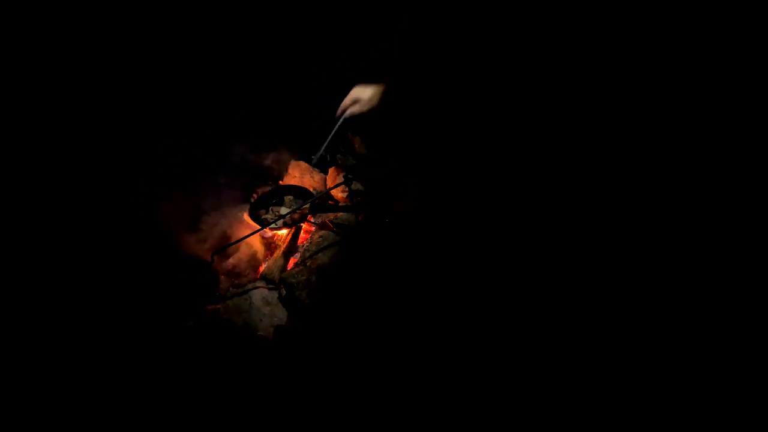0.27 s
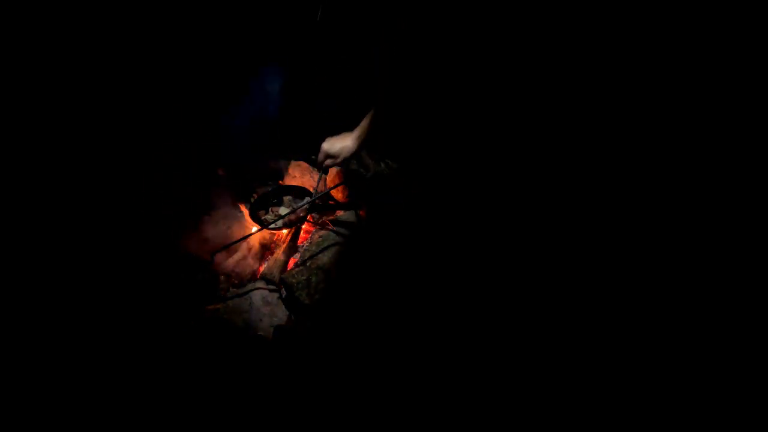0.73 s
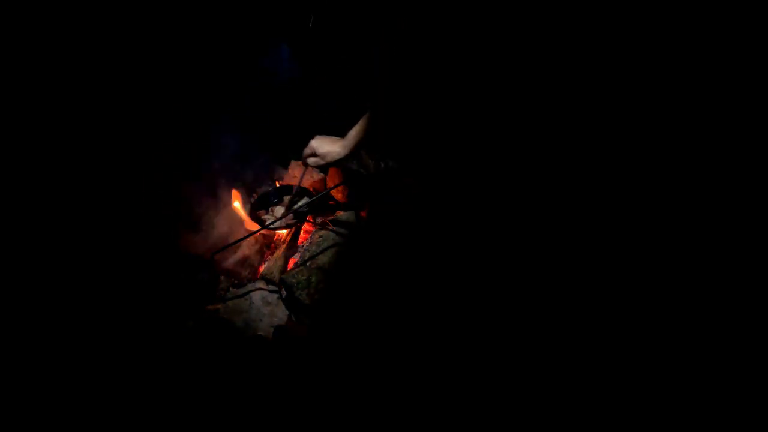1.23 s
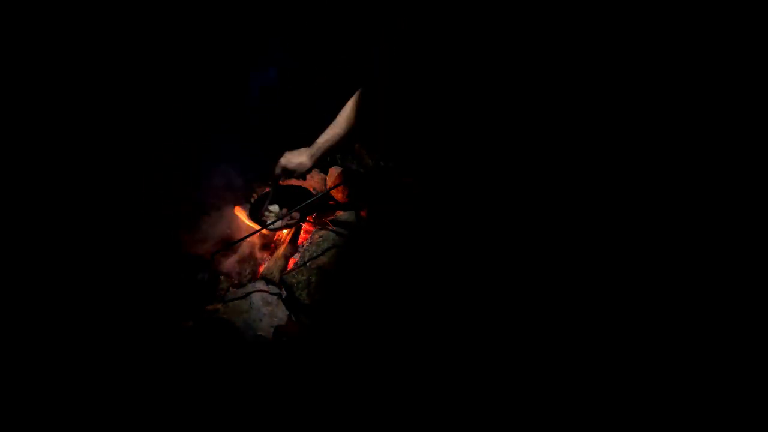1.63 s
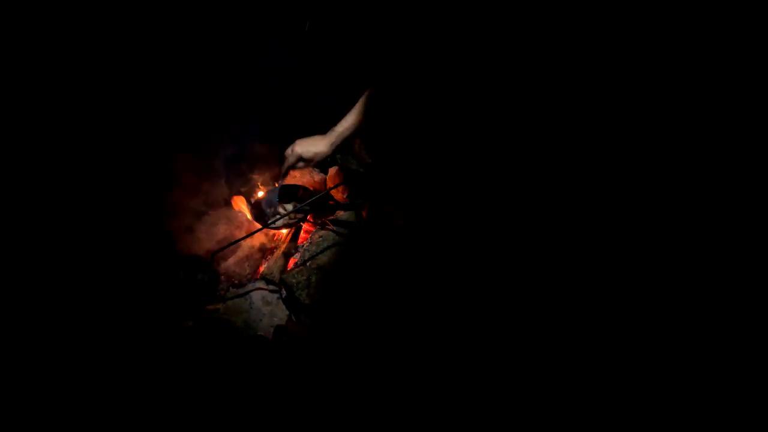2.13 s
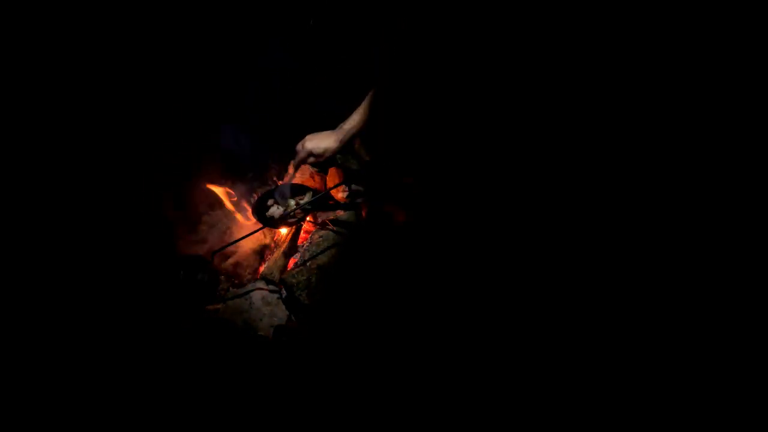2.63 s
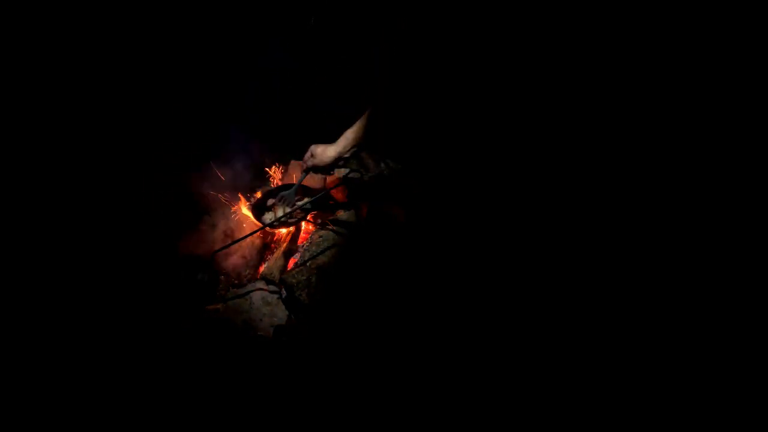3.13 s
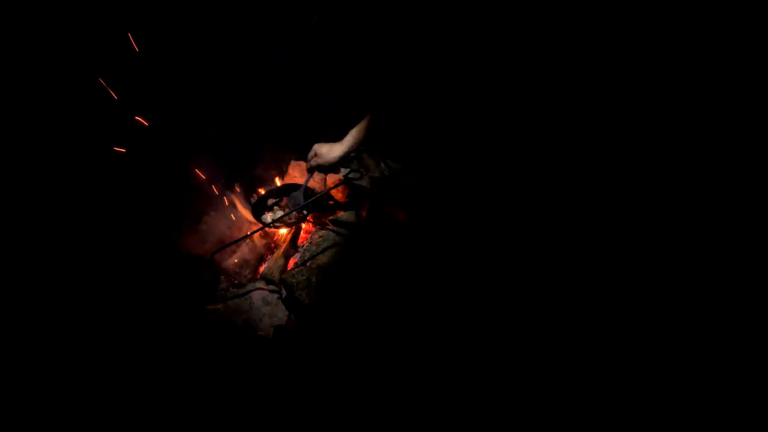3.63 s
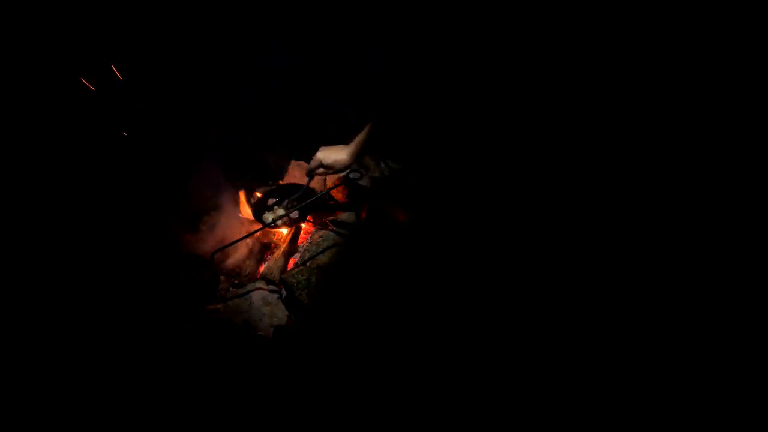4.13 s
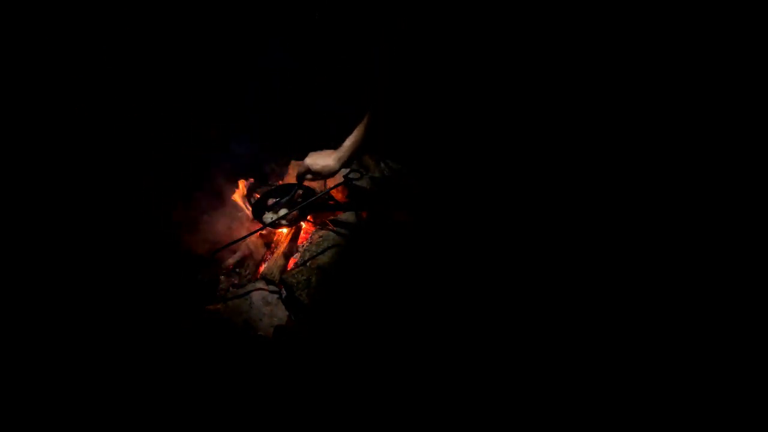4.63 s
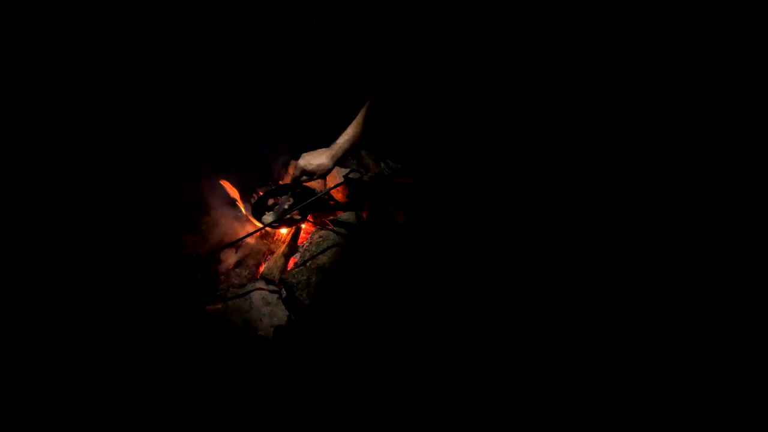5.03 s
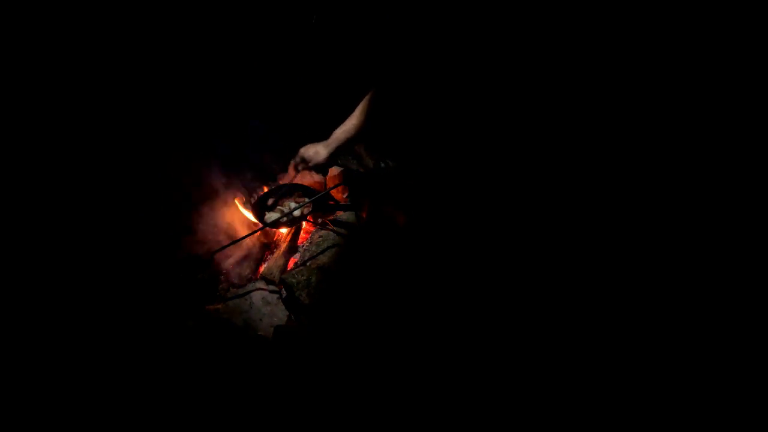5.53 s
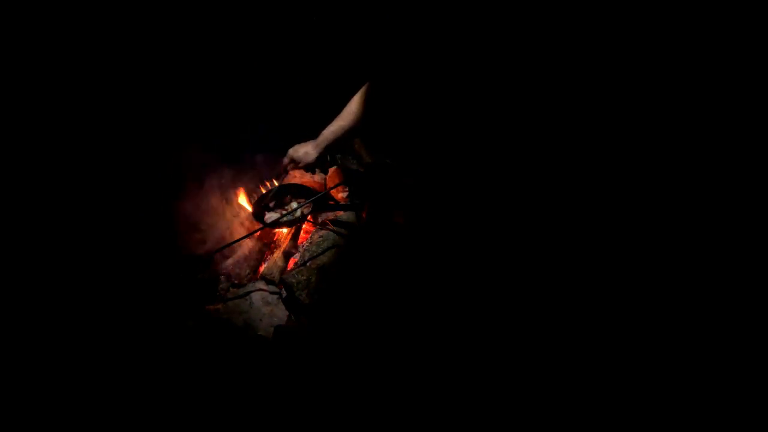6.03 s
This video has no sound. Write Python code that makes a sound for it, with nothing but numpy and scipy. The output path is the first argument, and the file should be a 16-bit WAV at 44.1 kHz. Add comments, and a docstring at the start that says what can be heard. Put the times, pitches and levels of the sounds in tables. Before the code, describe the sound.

Bacon fries in a skillet over a campfire at night. A soft bubbling hiss thickens with bright spits while a metal spatula knocks and scrapes the pan. Around three seconds a log pops violently with a short thump and ember crackle; the sizzle dips briefly, then returns strong. Close, dry, nearly mono outdoor pickup with no echo.

```python
"""At a campfire at night, bacon fries in an iron skillet over rumbling flames; a spatula knocks the pan.
Fat hisses as patchy filtered noise with tiny noise bursts; bubbles are short sines, and spits add a splash.
The spatula drives the damped modes of the pan. A log pops hard with a bang, a thump and a spray of embers.
Gain control ducks under loud peaks and slowly recovers; the stereo image is almost mono."""
import sys
import numpy as np
from scipy import signal
from scipy.fft import rfft, irfft, next_fast_len
from scipy.io import wavfile
from scipy.ndimage import uniform_filter1d, map_coordinates

SR = 44100
rng = np.random.default_rng(int(sys.argv[2]) if len(sys.argv) > 2 else 0)


def transcribe(signal):
    """Save signal, clipped to [-1, 1], as a 16-bit WAV file at the path in sys.argv[1]."""
    frames = np.atleast_2d(signal).T
    limited = np.clip(frames, -1, 1)
    pcm = np.round(limited * 32767).astype(np.int16)
    wavfile.write(sys.argv[1], SR, pcm)


N = 277389


def amp(db):
    """Decibel law: a level in dB as an amplitude factor."""
    return 10 ** (np.asarray(db) / 20)


def unit(x):
    """Power normalisation: x scaled to an RMS of one."""
    return x / np.sqrt(np.mean(x ** 2) + 1e-20)


def curves(rows):
    """Linear interpolation: one value per sample for each column after the time."""
    s, *columns = np.transpose(rows)
    return [np.interp(np.arange(N) / SR, s, column) for column in columns]


def wobble(rate):
    """Spline interpolation: a smooth random curve with rate knots a second."""
    knots = rng.standard_normal(int(N * rate / SR) + 4)
    return map_coordinates(knots, [np.arange(N) * rate / SR])


def coloured(x, points, tilt_db=0):
    """Minimum-phase filtering: (Hz, dB) gain points, tilted in dB per octave about 3500 Hz, made causal."""
    m = next_fast_len(N + SR // 4)
    hz = np.fft.rfftfreq(m, 1 / SR) + 1  # the offset avoids log 0
    f, db = np.transpose(points)
    gain_db = np.interp(np.log(hz), np.log(f), db) + tilt_db * np.log2(hz / 3500)
    cepstrum = irfft(np.log(amp(gain_db) + 1e-6), m)
    # folding the cepstrum onto positive time gives the minimum phase
    cepstrum[1:m // 2] *= 2
    cepstrum[m // 2 + 1:] = 0
    return irfft(rfft(x, m) * np.exp(rfft(cepstrum)), m)[:N]


def patchy(depth_db):
    """Time-frequency modulation: white noise with patches of random gain."""
    spectrogram = signal.stft(rng.standard_normal(N), nperseg=256)[2]
    field = uniform_filter1d(rng.standard_normal(spectrogram.shape), 8, 0)
    field = uniform_filter1d(field, 6, 1)
    return signal.istft(spectrogram * amp(depth_db * unit(field)), nperseg=256)[1][:N]


def scatter(s, shapes):
    """Superposition: each row of shapes added at its time in s."""
    at = np.round(s * SR).astype(int)[:, None] + np.arange(shapes.shape[1])
    return np.bincount(at.ravel(), shapes.ravel(), N + shapes.shape[1])[:N]


def bubbles(s, db, hz, cycles, size):
    """Bubble resonance: bursts as sines that swell, die away and rise slightly in pitch."""
    turns = np.outer(hz, np.arange(size) / SR)
    life = turns / np.reshape(cycles, (-1, 1))
    swell = np.e * 4 * life * np.exp(-4 * life)  # peaks at one, a quarter of the way through life
    return scatter(s, amp(db)[:, None] * swell * np.sin(2 * np.pi * turns * (1 + 0.065 * life)))


# Course of the frying: t/s, hiss level/dB, brightness/(dB/octave), bubbling level/dB re the hiss
FRYING_COURSE = [(0.0, -40, -.8, -7), (0.72, -40, -2, -7), (0.92, -35, 0, -1), (1.17, -36, -.8, 0),
                 (1.33, -33, -.2, 0), (1.58, -35.5, .6, -2), (1.85, -33, -.6, -3), (2.15, -36.5, 1, -4),
                 (2.4, -37, -.2, -3), (2.6, -35, -.5, -4), (2.8, -36.5, .1, -4.5), (3.0, -32.5, 1, -5),
                 (3.4, -30.5, .9, -6), (3.9, -33.5, .3, -6), (4.65, -30.5, .4, -4.5),
                 (5.05, -31.5, .5, -3.5), (5.4, -31.5, .3, -8), (5.75, -32.5, .2, -5), (6.29, -31, .8, -6)]
# Spectrum of spattering fat: f/Hz, spectral density level/dB per Hz
FAT_SPECTRUM = [(410, -44), (700, -22), (910, -17), (1110, -12.5), (1360, -13), (2430, -3.5), (3690, -2),
                (6480, -8.5), (7390, -13), (8880, -29), (10800, -16), (12000, -32), (13100, -34),
                (16000, -48)]


def sizzle():
    """Random superposition: steam hiss, a crackle of tiny bursts and ringing bubbles, all in flurries."""
    level_db, bright_db, bubbling_db = curves(FRYING_COURSE)
    flurry_db = 0.68 * wobble(12) + 0.83 * wobble(35) + 0.75 * wobble(110) + 0.65 * wobble(300)

    s, big, life = rng.random((3, 4000))
    t = np.arange(130) / SR
    size_db = -4.5 * np.log(big + 0.01)  # many small, few large
    t60 = 0.0018 + 0.007 * life[:, None] ** 2
    puffs = amp(size_db[:, None] - 60 * t / t60) * rng.standard_normal((len(s), len(t)))
    crackle = unit(scatter(s * (N - 1) / SR, puffs))
    burst = patchy(1.7) + amp(-4.0) * crackle

    # brightness moves by crossfading a dull and a bright version
    share = np.clip(.5 + bright_db / 5, 0, 1)
    dull = unit(coloured(burst, FAT_SPECTRUM, -2.5))
    bright = unit(coloured(burst, FAT_SPECTRUM, 2.5))
    hiss = (1 - share) * dull + share * bright

    s, big, pitch, shape, life = rng.random((5, 8000))
    hz = 3500 * np.exp(.3 * (pitch + shape - 1))
    size_db = -4.5 * np.log(big + 0.034)
    boiling = amp(1.5 * wobble(45))  # bubbles come in clusters of a few hundredths of a second
    ring = unit(boiling * bubbles(s * (N - 1) / SR, size_db, hz, 2.5 + 5.5 * life, size=200))
    return amp(level_db + flurry_db) * (hiss + amp(bubbling_db) * ring)


# Course of the fire's rumble: t/s, level/dB
FLAME_COURSE = [(0.0, -60), (.6, -57.5), (1.0, -60), (2.5, -56.5), (3.3, -54), (3.7, -59), (4.8, -59),
                (5.2, -56), (6.29, -55.5)]
# Spectrum of the fire's roar: f/Hz, spectral density level/dB per Hz
ROAR_SPECTRUM = [(18, -57), (40, -11), (70, -5.5), (120, -6), (170, -2.5), (257, -10), (453, -12),
                 (700, -11), (910, -33), (1540, -120)]


def flames():
    """Broadband low-frequency noise: the lumpy roar of the fire, filtered and slowly modulated."""
    level_db = curves(FLAME_COURSE)[0] + 0.56 * wobble(5.9)
    return amp(level_db) * unit(coloured(patchy(2.0), ROAR_SPECTRUM))


# Lesser spits: mean peak over the hiss and its spread, centre frequency, mean splash over the ring
SMALL_DB, SMALL_SPREAD_DB, SMALL_HZ, SMALL_SPLASH_DB = 11.5, 2, 3800, -12


def small_spits(count, start, stop):
    """Random arrivals: rows like those of the loud spits, with levels that follow the frying."""
    s = rng.uniform(start, stop, count)
    size, pitch, wet = rng.standard_normal((count, 3)).T
    hiss_db = np.interp(s, *np.transpose(FRYING_COURSE)[:2])
    peak_db = hiss_db + SMALL_DB + SMALL_SPREAD_DB * size
    return np.c_[s, peak_db, SMALL_HZ * np.exp(.14 * pitch), SMALL_SPLASH_DB + 4 * wet]


RING_CYCLES, DRIER_PER_DB = 3.1, .03  # a spit with less splash rings longer
STIRRED = (1.5, 3.05)  # (from s, to s): the spatula pushes the rashers about and they spit more often
# Loud spits: t/s, ring peak level/dB, ring f/Hz, splash level/dB re the ring (at most 3 is used)
LOUD_SPITS = [(0.3632, -15, 3850, -40), (0.5079, -13, 4300, -3), (1.1122, -18, 3380, -4),
              (1.244, -17, 3300, -12), (1.4397, -18, 3850, -5), (1.563, -15.5, 3800, -16),
              (1.6426, -17, 3500, -13), (1.702, -17, 4540, -12), (1.77, -13, 3700, -17),
              (1.7873, -15, 3900, -15), (1.815, -13.5, 2480, -9), (1.8745, -15, 3900, -5),
              (1.8925, -18, 3900, -12), (1.925, -17, 3400, -14), (1.9935, -19, 4000, -14),
              (2.0005, -19, 2900, -14), (2.0055, -16, 3960, -14), (2.0636, -18, 3770, -14),
              (2.074, -18, 6500, -6), (2.1017, -14, 3800, -8), (2.197, -16.5, 3490, -15),
              (2.2331, -16, 3600, -5), (2.2754, -15.5, 4500, -14), (2.3426, -15.5, 3160, -11),
              (2.378, -18, 3560, -12), (2.491, -13, 3500, -14), (2.518, -18, 3600, -12),
              (2.5791, -12, 2990, -4), (2.6515, -18, 2900, -12), (2.6694, -17, 4220, -11),
              (2.674, -18, 4600, -12), (2.6796, -14, 2910, -18), (2.709, -19, 2910, -14),
              (2.759, -17, 3750, -11), (2.9204, -16, 2950, -11), (2.9757, -16, 3790, -6),
              (2.9842, -14.5, 3120, -10), (3.0096, -14.5, 3100, -7), (3.0432, -11, 4100, -8),
              (3.0445, -9.5, 5000, -10), (3.0497, -13, 3300, -14), (3.0512, -13, 4800, -14),
              (3.0526, -14, 3960, -20), (3.1922, -12.5, 3440, -12), (3.5792, -11.5, 3500, -5),
              (3.6864, -15, 3700, -14), (3.8936, -17, 4240, -12), (4.1695, -16, 4100, -10),
              (4.551, -16, 3300, -5), (4.676, -16, 3670, -3), (4.691, -15, 4000, -8),
              (4.8543, -17, 4700, -16), (4.857, -12, 4700, -14), (4.8582, -14, 4600, -12),
              (4.8685, -18, 3700, -20), (5.0102, -15.5, 3550, -8), (5.3659, -16, 3650, -1),
              (5.5599, -17, 6660, -5), (5.5837, -16.5, 6330, -3), (5.666, -15, 6060, -1),
              (5.8267, -17, 3590, -8), (5.8662, -17, 3700, -2), (6.0625, -18, 3700, 2),
              (6.084, -15, 3800, -10), (6.1612, -15, 3500, -5), (6.2047, -17, 3530, -3)]


def spits():
    """Resonance plus turbulence: each larger bubble is a ring and a sputtering splash of fat."""
    throughout = small_spits(count=110, start=0, stop=N / SR)
    stirred = small_spits(count=45, start=STIRRED[0], stop=STIRRED[1])
    s, db, hz, splash_db = np.vstack([LOUD_SPITS, throughout, stirred]).T
    noise, t = rng.standard_normal((len(s), 1400)), np.arange(1400) / SR
    sputter = amp(3.5 * np.repeat(rng.standard_normal((len(s), 35)), 40, axis=1))
    splash_level = amp(db + np.minimum(splash_db, 3))[:, None]
    splash = splash_level * amp(-60 * t / 0.03) * sputter * noise
    cycles = RING_CYCLES * np.exp(-DRIER_PER_DB * splash_db) * amp(0.61 * noise[:, 0])
    return bubbles(s, db, hz, cycles, size=500) + coloured(scatter(s, splash), FAT_SPECTRUM)


MUFFLED_T60_S = .04  # the blade resting on the pan stills it
DETUNE = .03  # the load of fat shifts the modes above 650 Hz from blow to blow (relative spread)
SPREAD_DB, CHATTER_DB = 2, 3.5  # each blow lands elsewhere; the rub stutters
# Spatula contacts: t/s, peak level/dB before the bass cut, upper modes/(dB/octave),
# rub decay t60/s, delay until the pan is muffled/s
SPATULA_KNOCKS = [(.509, -33, 0, 0.04, .05), (1.816, -21, 12, 0.6, .04), (1.934, -24, -1, 0.08, .018),
                  (2.033, -35, -5, 0.12, .03), (2.4896, -18, 3, 0.15, .032), (2.557, -26.5, -5, .15, .018),
                  (2.582, -29, -6, 0.03, .01), (2.594, -25.5, -3, 0.04, .012),
                  (2.678, -14.5, 12, 0.04, .012), (4.185, -39, -3, .3, .05), (4.239, -36, 4, .3, .05),
                  (4.553, -27, 11, 0.056, .03), (6.038, -28, 0, 0.3, .05)]
# Modes of the pan: f/Hz, level/dB, decay t60/s
PAN_MODES = [(302, -20, 0.06), (494, -14, 0.04), (614, 0, 0.08), (704, -2, 0.05), (880, -4, 0.03),
             (1140, -4, 0.03), (1420, -7, 0.025), (1880, -6, 0.03), (2280, -4, 0.03), (2550, -6, .025),
             (2800, -5, .03), (3200, -6, 0.02), (3560, -7, .025), (4200, -14, .015)]


def spatula():
    """Modal excitation: a tap and a chattering rub drive the damped pan; sharp blows favour upper modes."""
    t, knocks = np.arange(SR // 4) / SR, []
    for s, db, upper_db, rub_t60, muffled_s in SPATULA_KNOCKS:
        ring = 0
        for k, (hz, level, t60) in enumerate(PAN_MODES):
            mode_db = level + upper_db * np.log2(hz / 600) + SPREAD_DB * rng.standard_normal()
            mode_hz = hz * (1 + DETUNE * rng.standard_normal() * (hz > 650))
            ring = ring + (-1) ** k * amp(mode_db - 60 * t / t60) * np.sin(2 * np.pi * mode_hz * t)
        chatter = amp(CHATTER_DB * np.repeat(rng.standard_normal(len(t) // 60 + 1), 60)[:len(t)])
        rub = amp(-60 * t / rub_t60) * rng.standard_normal(len(t)) * chatter
        rub[0] = 14  # the tap
        muffle = amp(-60 * np.maximum(t - muffled_s, 0) / MUFFLED_T60_S)
        knock = muffle * signal.fftconvolve(ring, rub)[:len(t)]
        knocks.append(amp(db) * knock / np.abs(knock).max())
    thin = signal.butter(2, 260, "high", fs=SR, output="sos")  # a small pan radiates no bass
    return signal.sosfilt(thin, scatter(np.array(SPATULA_KNOCKS)[:, 0], np.array(knocks)))


POP_S = 3.0968


def log_pop():
    """Impulsive pressure release: a gas pocket bursts with a bang, a thump of the log and a spray of embers."""
    t = np.arange(SR // 5) / SR
    bang_envelope = (1 - np.exp(-t / .0001)) * np.exp(-(t / .0012) ** 4)
    bang = amp(2.5) * np.sin(2 * np.pi * 2950 * t) * bang_envelope
    crack = amp(12.5) * (t / .001) * np.exp(-t / .00075) * rng.standard_normal(len(t))
    thump = amp(-3.5 - 60 * t / .027) * np.sin(2 * np.pi * 195 * t - .9) * (1 - np.exp(-t / .002))

    late, size, pitch = rng.random((3, 70))
    spark_s = POP_S + .002 + .036 * late ** 2
    spark_db = -9 - 10 * size - 10 * late ** 2  # later embers tend to be weaker
    embers = bubbles(spark_s, spark_db, 4400 + 2800 * pitch, 3 + 0 * late, size=80)

    at = np.array([POP_S])
    return scatter(at, (bang + thump)[None]) + coloured(scatter(at, crack[None]), FAT_SPECTRUM, 4.5) + embers


# Spectrum of the faint side hiss: f/Hz, spectral density level/dB per Hz
SIDE_SPECTRUM = [(60, -30), (9500, -28), (10800, -3), (12200, -3), (13400, -11), (15800, -18)]


def side_hiss(fry):
    """Filtered noise: faint treble hiss, opposite in left and right, that follows the level of the frying."""
    loudness = np.sqrt(np.abs(uniform_filter1d(fry ** 2, 2000)))
    return amp(-35) * loudness * unit(coloured(rng.standard_normal(N), SIDE_SPECTRUM))


def scene():
    """Linear superposition: all sources in the middle, with a faint side signal."""
    fry = sizzle() + spits()
    mid = fry + flames() + spatula() + log_pop()
    side = side_hiss(fry)
    return np.array([mid + side, mid - side])


TOP_HZ = 15800  # upper band limit


def record(dry):
    """Dynamic compression: peaks pull the gain down fast and it creeps back; then soft clipping."""
    over_db = np.maximum(20 * np.log10(np.abs(dry).max(0) + 1e-9) + 8, 1e-6)  # threshold at -8 dB
    release = np.arange(N) / SR / .48  # the cut decays with a time constant of 0.48 s
    cut_db = np.exp(np.maximum.accumulate(np.log(over_db) + release) - release)
    lagging_db = uniform_filter1d(np.pad(cut_db, (40, 0))[:N], 80)  # the attack takes about 2 ms
    bass_cut = signal.butter(2, 75, "high", fs=SR, output="sos")  # the microphone's small capsule
    x = signal.sosfilt(bass_cut, dry) * amp(-lagging_db)
    x = x / (1 + np.abs(x / 0.59) ** 6) ** (1 / 6)  # soft clipping towards 0.59
    m = next_fast_len(N + SR // 4)
    return irfft(rfft(x, m) * (np.fft.rfftfreq(m, 1 / SR) < TOP_HZ), m)[:, :N]


dry = scene()
out = record(dry)
transcribe(out)
```